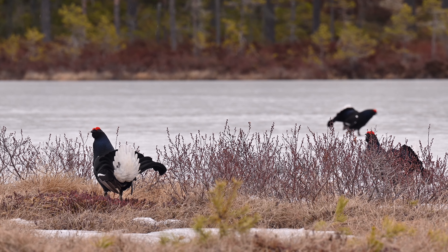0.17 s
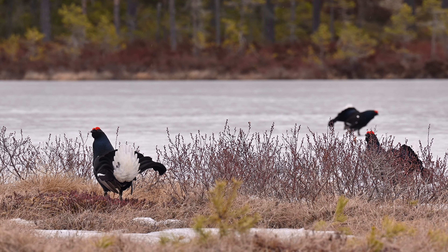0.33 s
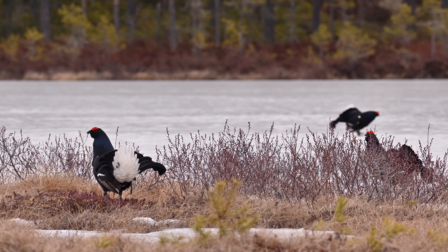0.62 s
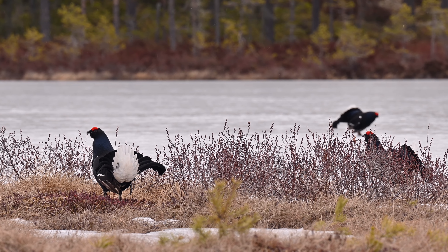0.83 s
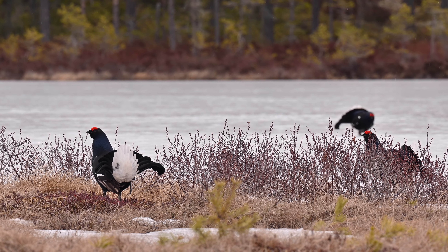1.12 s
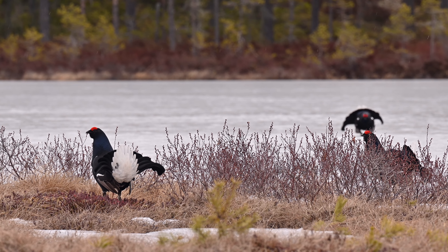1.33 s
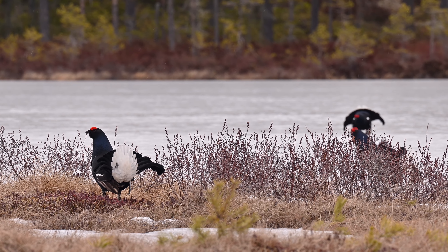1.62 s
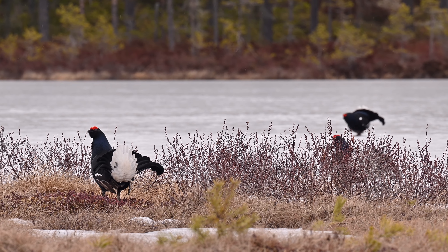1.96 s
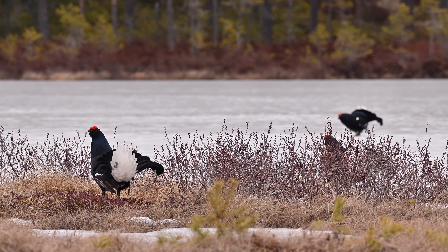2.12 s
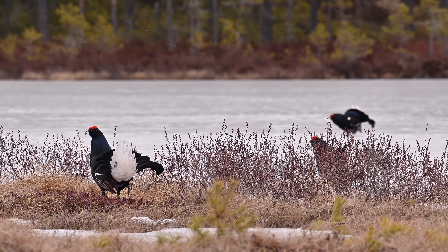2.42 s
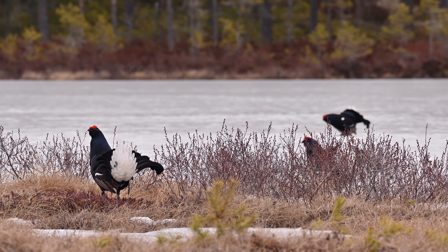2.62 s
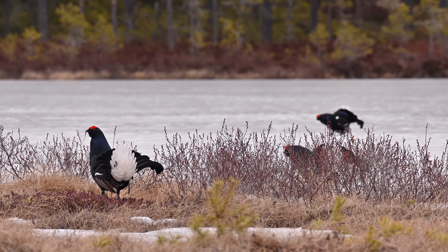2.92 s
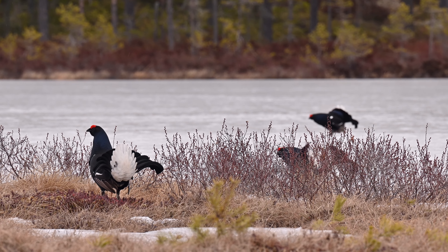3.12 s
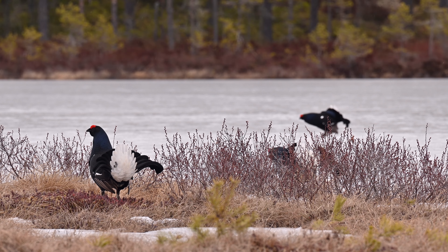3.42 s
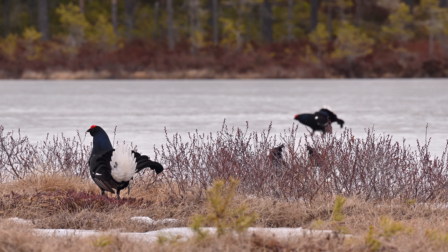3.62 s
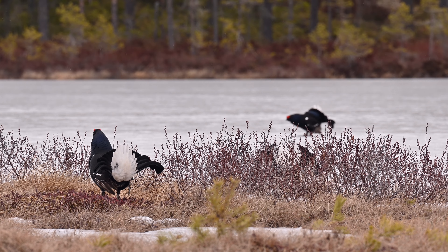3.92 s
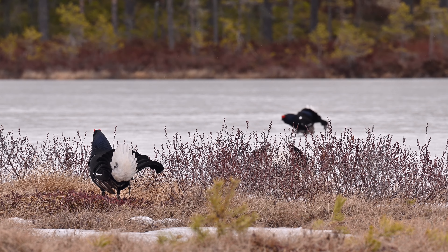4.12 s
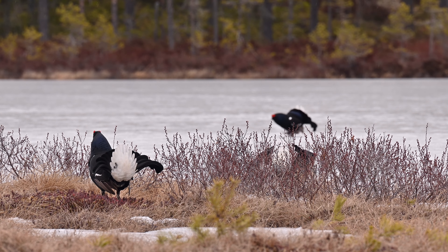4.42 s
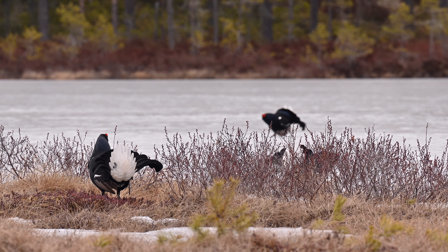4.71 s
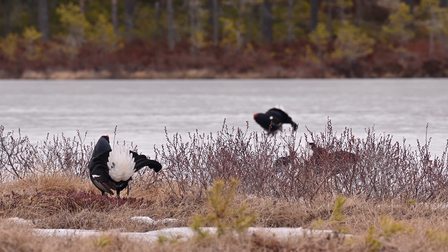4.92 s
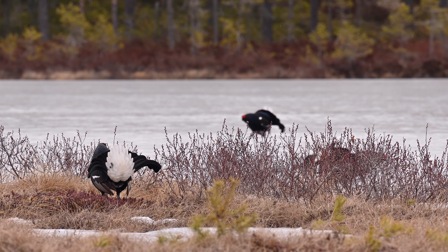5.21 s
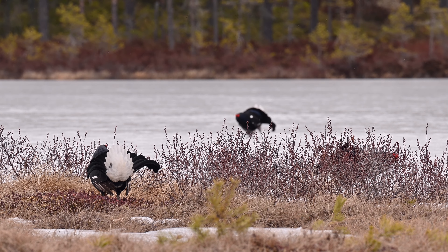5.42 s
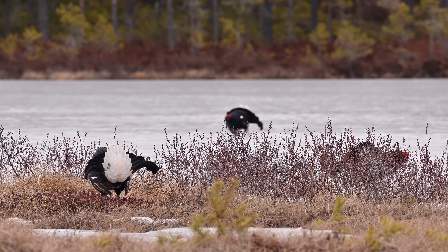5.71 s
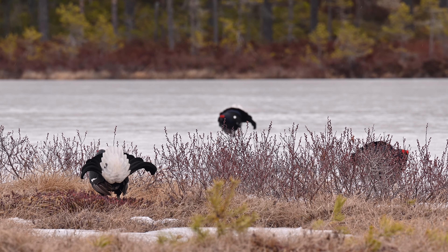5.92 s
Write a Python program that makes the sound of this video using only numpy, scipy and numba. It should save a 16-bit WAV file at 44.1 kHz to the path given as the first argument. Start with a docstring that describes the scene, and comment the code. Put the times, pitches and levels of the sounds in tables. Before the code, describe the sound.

Open bog by a frozen lake, quiet air noise, mono and outdoors. At 0 s a close grouse gives a sharp, breathy hiss lasting 0.3 s, while soft low coos begin bubbling, about fifteen a second, each a tiny hollow falling glide around 400 to 500 Hz. After a short gap they resume at 0.5 s and rise a little by 1.2 s; a faint foot tick falls at 1.3 s. From 1.8 to 2.4 s a farther, duller, uneven hiss passes beneath arched coos. Very faint hissing also carries across the bog. Distant thin whistles flicker from 2.3 s. Around 3.4 s come two soft footfalls. From 3.5 s the coos overlap, and after 4.2 s they are dense and louder, strongest near 5.6 s, with hurried high twitters around 5 to 5.5 s. Low wind swells gently at 5.5 s, a tick follows at 5.7 s, and bubbling continues to 6 s with a faint forest echo.

```python
"""Black grouse cocks display on a bog beside a frozen lake, bubbling in short, nearly pure gliding coos
whose loudness and band are set by the resonance of the inflated neck sac. Cocks hiss near and far: noise
bands with moving resonances. Distant thrushes whistle in flickering, smeared sines, and feet tick and thud
on frozen moss. The pine forest behind scatters the calls into a faint echo tail; steady air noise and
swelling low wind make a quiet floor."""
import sys
import numpy as np
from scipy import signal
from scipy.fft import rfft, irfft
from scipy.io import wavfile
from numba import njit

SR = 44100
rng = np.random.default_rng(int(sys.argv[2]) if len(sys.argv) > 2 else 0)


def to_wav(sig):
    """Store sig (one row per channel, or 1-D mono) as 16-bit WAV at the path in sys.argv[1].

    Samples outside -1..1 are clipped; the rate is SR.
    """
    pcm = np.clip(np.atleast_2d(sig), -1, 1) * 32767
    pcm = np.round(pcm).astype(np.int16)
    wavfile.write(sys.argv[1], SR, pcm.T)  # frames by channels


N = 267290   # length in samples

# Spectrum of the steady air noise. Each row: frequency in Hz, relative density in dB.
AIR_SPECTRUM = [(20, -26.5), (60, -5), (136, -6.5), (306, 6), (539, 6.5), (686, 3), (807, 6.5), (874, -3.5),
                (1310, -9), (2240, -9.5), (3450, -12), (5760, -13.5), (12200, -13.5), (15900, -14.5)]
AIR_DB = -66   # rms level
# Level path of the low wind. Each row: time in seconds, middle level of the gusts in dB.
WIND_LEVEL = [(0.0, -80), (1.3, -79), (2.3, -75), (3.0, -77.5), (3.4, -74.5), (4.8, -77), (5.5, -67.5),
              (6.06, -74)]

# Two hisses, near then far, as breakpoints. Each row: time in seconds, throat band level in dB,
# beak band in dB relative to the throat, top band in dB relative to the throat,
# upper resonance in Hz, throat resonance in Hz.
HISS_PATHS = [
    [(0.0, -47.5, -1, -24, 5860, 1780), (0.058, -49.5, -1, -11.5, 6300, 2130),
     (0.18, -50, -4.5, -9, 7350, 2250), (0.24, -51, -11, -10, 5980, 2080),
     (0.276, -54.5, -11, -17, 5670, 1940), (0.3, -91, 3, -12, 5640, 2010)],
    [(1.795, -75, -15, -10, 5700, 2070), (1.832, -55.5, -0.5, -28, 5700, 2090),
     (1.866, -50.5, 0, -18, 6360, 2120), (1.926, -61, -1.5, -14, 5500, 1970),
     (1.972, -59, -5.5, -17, 4990, 1620), (2.034, -61, -3, -21, 5300, 1710),
     (2.128, -59, 0, -17, 5540, 1660), (2.194, -59.5, -1, -30, 4270, 1980),
     (2.258, -59.5, -6, -31, 3950, 1750), (2.348, -64, -13.5, -13, 4400, 1900),
     (2.41, -84, -4, -12, 4600, 2000)],
]
# Throat noise of the near and the far cock. Each row: frequency in Hz, relative density in dB.
THROAT_NEAR_SPECTRUM = [(530, -40), (900, -11), (1250, -28), (1400, -18), (1580, -11.5), (2020, 0),
                        (2650, -4), (3240, -13), (3600, -26), (4680, -49), (7920, -120)]
THROAT_FAR_SPECTRUM = [(530, -37), (900, -2.5), (1090, -7.5), (1250, -8.5), (1530, 1), (1980, -3),
                       (2260, 2), (3280, -17.5), (3600, -12.5), (4680, -49), (7920, -120)]
# Upper noise of the near and the far cock. Each row: frequency in Hz, relative density in dB.
BEAK_NEAR_SPECTRUM = [(1760, -16.5), (3000, 0), (3260, -7), (3640, -0.5), (4510, -2), (4840, 0.5),
                      (5830, -1), (6430, -7), (6700, -7.5), (7750, -2), (8360, -6), (11800, -8),
                      (14100, -13), (15700, -20)]
BEAK_FAR_SPECTRUM = [(1760, -21), (3000, 4), (3370, -5), (3740, 4), (4500, -2.5), (4970, -0.5), (5520, -4),
                     (5980, -4), (6490, -6.5), (6800, -3.5), (7900, -10), (8470, -15), (9910, -21),
                     (12000, -22), (15600, -52), (22000, -120)]

# Falling notes of the bubbling roll. Each row: start in seconds, first pitch in Hz, effort in dB.
ROLL = [(0.016, 477, -38.5), (0.084, 456, -40.5), (0.151, 471, -38.2), (0.219, 487, -36.7),
        (0.544, 484, -38), (0.613, 483, -38), (0.68, 467, -35.5), (0.745, 495, -36.5), (0.816, 491.5, -35),
        (0.883, 493, -34.5), (0.95, 501, -34.7), (1.018, 511, -33), (2.768, 430, -32.5),
        (2.862, 455.4, -39.5), (2.935, 479, -38), (3.006, 485, -34.5), (3.073, 503, -35.5),
        (3.151, 480, -28.6), (3.219, 475.5, -27), (3.281, 508.6, -35.5), (3.289, 431.4, -34),
        (3.348, 524, -35), (3.354, 460.6, -33), (3.413, 524, -33.9), (3.484, 536, -32.5), (3.763, 463, -33),
        (3.831, 468, -31.5), (3.9, 466.4, -30.5), (3.924, 490.5, -32.5), (3.968, 471.6, -30.9),
        (3.987, 493, -37.5), (4.035, 490.5, -31.3), (4.171, 492.5, -30), (4.171, 516.6, -29),
        (4.482, 505, -32.5), (4.545, 504, -35.4), (4.709, 538, -34.5), (4.9, 528, -33), (5.167, 551, -29.5),
        (5.225, 505, -32), (5.232, 555, -31), (5.922, 507, -33)]
ROLL_NOTE_S, ROLL_SWELL_DB = 0.0438, -0.5   # note length; growth of effort through the note
ROLL_MIDDLE, ROLL_END = .87, 0.812   # pitch halfway and last, as share of the first
# Arched and freely gliding coos. Each row: start in seconds, length in seconds, first, middle and
# last pitch in Hz, effort in dB, growth of effort through the coo in dB.
ARCHED_COOS = [(0.285, 0.017, 469, 452, 422, -38.5, 1), (0.48, 0.043, 467, 411, 395, -36, 5),
               (1.086, 0.037, 548, 497, 436, -31, 0), (1.155, 0.034, 577, 565, 430, -27.5, -1.5),
               (1.218, 0.037, 590, 598, 496, -28, 4.5), (1.285, 0.025, 606, 604, 510, -29.5, -1),
               (1.494, 0.037, 347, 392, 402, -33, 6), (1.504, 0.03, 670, 566, 507, -43, -18),
               (1.557, 0.046, 445, 400, 387, -31, 5), (1.56, 0.055, 511, 592, 513, -28.5, 4.5),
               (1.699, 0.012, 592, 599, 544, -27, 3), (1.807, 0.049, 451, 597, 507, -29.5, 3.5),
               (1.88, 0.044, 425, 503, 475, -32, 15.5), (1.97, 0.038, 470, 597, 555, -30.5, -1),
               (2.01, 0.038, 545, 585, 575, -31.5, -6), (2.06, 0.017, 586, 596, 597, -35.5, 3),
               (2.083, 0.021, 620, 560, 502, -29, 5), (2.162, 0.01, 620, 570, 520, -43.5, -2),
               (2.203, 0.0088, 539, 492, 460, -35.5, 0), (2.228, 0.028, 481, 501, 425, -33, 1),
               (2.282, 0.017, 485, 540, 600, -31, 15.5), (2.312, 0.021, 633, 566, 495, -28.5, 0),
               (2.379, 0.01, 625, 576, 549, -27.5, -1), (2.46, 0.037, 571, 588, 550, -25.6, 4),
               (2.541, 0.03, 512, 569, 564, -26.5, 4.6), (2.585, 0.019, 539, 570, 615, -40, 4),
               (2.615, 0.02, 588, 567, 500, -27.5, 2.5), (2.715, 0.03, 340, 371, 404, -33, 3),
               (2.807, 0.043, 605, 447, 368, -33.5, 0.5), (2.875, 0.05, 390, 419, 360, -36.5, 10),
               (3.55, 0.039, 568, 489, 440, -31, 1), (3.621, 0.026, 570, 570, 480, -29, 1),
               (3.63, 0.024, 487, 420, 395, -33.5, 5), (3.66, 0.017, 418, 433, 457, -29.5, -2),
               (3.682, 0.036, 567, 605, 493, -28, 4), (3.69, 0.046, 480, 418, 367, -32.5, 2),
               (3.751, 0.027, 597, 600, 502, -31.5, -0.5), (3.975, 0.03, 543, 698, 564, -38, 2),
               (4.038, 0.058, 472.3, 623.6, 430, -31.5, 4), (4.044, 0.048, 529, 606, 450, -36, 5),
               (4.071, 0.068, 550, 499, 394, -29.5, 2), (4.176, 0.017, 534, 579, 494, -28.4, 2.5),
               (4.237, 0.034, 560, 540, 433, -25.5, 5), (4.279, 0.019, 449, 473, 541, -30, 3.5),
               (4.302, 0.041, 599, 580, 462, -23.5, 3.5), (4.347, 0.053, 357, 456, 404, -28.5, 8),
               (4.37, 0.035, 634.4, 602.3, 484, -23.8, 1.5), (4.391, 0.013, 457.5, 519, 487, -23, 0.5),
               (4.41, 0.046, 429, 446, 443, -32.5, -1), (4.43, 0.028, 594.5, 607, 477, -26.5, 1),
               (4.447, 0.057, 568.7, 582, 537, -29.5, -1), (4.502, 0.03, 442.5, 583, 575, -34.5, -4),
               (4.56, 0.023, 605, 565, 501, -30.5, 9.5), (4.612, 0.032, 513, 448, 420, -31.5, 1),
               (4.625, 0.0295, 587, 700, 607, -37, 7), (4.684, 0.063, 506, 572, 507, -28.5, 4),
               (4.684, 0.023, 453, 487, 510, -43, 1), (4.759, 0.019, 450, 530, 594, -34.5, 19.5),
               (4.786, 0.023, 679, 630, 513, -30.5, 5), (4.819, 0.024, 637, 548, 437, -25.5, -2.5),
               (4.85, 0.017, 606, 648, 581, -27.5, 7), (4.854, 0.023, 461, 453, 492, -28.5, 0.5),
               (4.922, 0.061, 402, 599, 413, -26, 5.5), (4.938, 0.062, 491, 596, 528, -37.5, -1),
               (5.015, 0.033, 489.7, 482, 448, -22.5, 6), (5.036, 0.024, 536.5, 563, 497, -27.5, -3),
               (5.073, 0.043, 536.5, 632, 482, -31.5, 1), (5.089, 0.071, 481.4, 524, 541, -30, 1),
               (5.098, 0.027, 497, 625, 480, -26, 5), (5.208, 0.037, 584.4, 507, 458, -31.5, 1.5),
               (5.308, 0.037, 529, 491, 437, -29, -2.5), (5.344, 0.066, 380, 496.5, 406, -28.5, 4.5),
               (5.357, 0.027, 390, 567, 472, -32.5, 4), (5.405, 0.017, 430, 488, 597, -25.5, 8.5),
               (5.44, 0.032, 563, 537, 466, -24, 0), (5.487, 0.064, 679, 566, 444, -26.5, 6),
               (5.49, 0.033, 657, 578.6, 542, -28, 1), (5.576, 0.058, 578, 615, 528, -21, -1),
               (5.593, 0.022, 472, 533, 470, -25, -0.5), (5.617, 0.065, 548.6, 616, 490, -20.7, 6),
               (5.62, 0.014, 543, 617, 589, -25, 3.5), (5.675, 0.031, 377.6, 567, 520, -26.5, 5),
               (5.71, 0.027, 635, 633, 592, -21.5, -5), (5.719, 0.024, 525, 597.5, 555, -20, -1),
               (5.758, 0.025, 502, 642, 595, -25.5, 2), (5.767, 0.031, 450.2, 671, 511, -22, 3),
               (5.775, 0.011, 515, 650, 521, -31, -5), (5.79, 0.015, 583.7, 532, 420, -24.5, -2),
               (5.8, 0.029, 561, 445, 410, -36.5, -3), (5.848, 0.034, 533, 435, 407, -29.5, -4.5),
               (5.958, 0.033, 652.5, 508, 338, -31, 9.5), (5.96, 0.035, 562, 512, 450, -35.5, 0),
               (6.0, 0.064, 513, 416, 364, -30, -0.5), (6.044, 0.016, 576, 638, 533, -30.5, 7)]
SAC_HZ, SAC_HALF_WIDTH_HZ = 524.1, 37.6   # a coo is favoured while its pitch crosses this resonance
SAC_LOW_HZ, SAC_HIGH_HZ = 252, 696   # band that the sac passes
ONSET_S, ONSET_DB = 0.007027, -13.5   # a coo starts this early and this softly, already on its glide
RELEASE_S, RELEASE_DB, RELEASE_DROP_HZ = 0.0033, -7, 30.3   # and dies away on a sinking pitch

ECHO_T60_S = 0.28
COO_ECHO_DB, WHISTLE_ECHO_DB, HISS_ECHO_DB = -26.5, -15, -22.5

# Cocks hissing across the bog. Each row: start in seconds, length in seconds, level in dB.
DISTANT_HISSES = [(0.286, 0.83, -79), (2.45, 1.12, -79)]
DISTANT_FADE_S = 0.22

# Feet on frozen moss. Each row: time in seconds, tick level in dB, thud level in dB.
FOOTSTEPS = [(1.296, -56.5, -74), (3.3687, -65, -56), (3.471, -66, -54), (5.7344, -61.5, -75)]

# Distant whistles. Each row: start in seconds, length in seconds, first, middle and last pitch in Hz,
# level at the middle in dB, before flicker and smear.
WHISTLE_NOTES = [ (2.25, 0.17, 2760, 2280, 2145, -72.5), (2.5, .07, 2480, 1970, 1920, -66.5),
                 (2.6, .09, 1990, 2100, 2260, -68.5), (2.881, 0.062, 2480, 2460, 2460, -69.5),
                 (2.97, .03, 2940, 2800, 2300, -64.5), (3.0, .025, 2440, 2550, 2800, -68),
                 (3.057, 0.12, 2905, 2780, 2480, -68), (3.195, 0.021, 2250, 1950, 1730, -71),
                 (3.577, 0.022, 3450, 4260, 4780, -69.5), (3.603, 0.03, 4800, 4880, 4780, -77),
                 (4.165, 0.14, 2900, 2960, 3140, -76.5), (4.26, 0.076, 4800, 4600, 4450, -79),
                 (4.382, .016, 4880, 4100, 3000, -73), (4.5, .016, 4940, 4350, 3610, -74),
                 (4.69, 0.053, 2880, 2490, 2420, -68.5), (4.749, 0.094, 2470, 2640, 2450, -63.5),
                 (4.863, .013, 4780, 4320, 3900, -74.5), (4.871, 0.016, 2545, 2680, 3030, -64),
                 (4.892, 0.029, 2750, 2520, 2570, -72.5), (4.99, 0.05, 2324, 2200, 2130, -69.5),
                 (5.04, 0.02, 2164, 2210, 2195, -70), (5.066, 0.015, 2195, 2160, 2200, -72.5),
                 (5.088, .025, 2220, 2254, 2250, -67), (5.078, 0.012, 3560, 3580, 3900, -61.5),
                 (5.098, .008, 3750, 3670, 3480, -65.5), (5.105, .017, 2350, 2580, 2950, -66),
                 (5.13, 0.012, 2830, 2720, 2670, -64.5), (5.159, .022, 2860, 2780, 2876, -68),
                 (5.165, .02, 3240, 3720, 4160, -68), (5.19, .018, 2810, 2880, 3040, -64),
                 (5.205, 0.024, 2730, 2450, 2550, -71.5), (5.268, .01, 3370, 3560, 3950, -61.5),
                 (5.289, 0.011, 2900, 2870, 2910, -66), (5.375, .022, 3500, 3960, 4050, -69),
                 (5.405, .018, 3390, 3920, 4470, -65.5), (5.424, 0.018, 4550, 4590, 4580, -72.5),
                 (5.41, .012, 2920, 3140, 3400, -69), (5.422, 0.024, 3440, 3430, 3580, -68),
                 (5.45, 0.022, 3590, 3270, 2800, -68.5)]
WHISTLE_EDGE_DB = 5.5   # a whistle is this much softer at both ends

CUTOFF_HZ = 15750


def amp(db):
    """Logarithmic scale: decibels become an amplitude gain."""
    return 10 ** (np.asarray(db) / 20)


def rms_one(x):
    """Normalisation: a signal is scaled to unit rms."""
    return x / np.sqrt(np.mean(x ** 2) + 1e-20)


def coloured(spectrum, size):
    """Spectral shaping: white noise is weighted in frequency and brought to unit rms."""
    hz, db = np.transpose(spectrum)
    grid = np.fft.rfftfreq(size, 1 / SR) + 1
    weights = amp(np.interp(np.log(grid), np.log(hz), db))
    return rms_one(irfft(rfft(rng.standard_normal(size)) * weights, size))


def drift(per_s, size):
    """Low-pass filtering: two equal poles turn white noise into a slow wander of unit rms."""
    r = np.exp(-2 * np.pi * per_s / SR)
    wander = signal.lfilter([1], [1, -2 * r, r * r], rng.standard_normal(size + SR))
    return rms_one(wander[SR:])   # the first second lets the filter settle


def add(out, start_s, piece):
    """Superposition: a piece is summed into a track, cut at the track's ends."""
    i = round(start_s * SR)
    piece = piece[max(-i, 0):N - i]
    out[max(i, 0):max(i, 0) + len(piece)] += piece


def arc(first, middle, last):
    """Quadratic interpolation: a parabola through three values, with its steps from 0 to 1."""
    u = np.linspace(0, 1, num=17)
    start_part = first * (1 - u) * (1 - 2 * u)
    middle_part = middle * (1 - (2 * u - 1) ** 2)
    return u, start_part + middle_part + last * u * (2 * u - 1)


def glide(s, hz, db, rise_s, fall_s):
    """Frequency modulation: phase is the integral of pitch; short fades lie before and after the path."""
    t = np.arange(s[0] - rise_s, s[-1] + fall_s, 1 / SR)
    ramp = np.minimum((t - s[0]) / rise_s, (s[-1] - t) / fall_s) + 1
    fades = np.sin(np.pi / 2 * np.clip(ramp, 0, 1)) ** 2
    phase = 2 * np.pi * (rng.random() + np.cumsum(np.interp(t, s, hz)) / SR)
    return amp(np.interp(t, s, db)) * fades * np.sin(phase)


@njit
def moving_resonance(x, hz, r, sr):
    """Resonance: a pole pair of radius r whose centre frequency follows hz."""
    y = np.zeros(len(x))
    for i in range(2, len(x)):
        drive = (1 - r * r) / 2 * (x[i] - x[i - 2])
        y[i] = drive + 2 * r * np.cos(2 * np.pi * hz[i] / sr) * y[i - 1] - r * r * y[i - 2]
    return y


def swept(spectrum, centre_hz, width_hz, boost_db):
    """Resonance in turbulence: coloured noise plus its own response to one moving resonance."""
    air = coloured(spectrum, len(centre_hz))
    pole_radius = np.exp(-np.pi * width_hz / SR)
    return rms_one(air + amp(boost_db) * moving_resonance(air, centre_hz, pole_radius, SR))


def floor():
    """Broadband background: steady coloured air noise, with band-limited low wind that swells."""
    s, db = np.transpose(WIND_LEVEL)
    low_band = signal.butter(2, [100, 250], "band", fs=SR, output="sos")
    wind = signal.sosfilt(low_band, rng.standard_normal(N))
    gusts = amp(np.interp(np.arange(N) / SR, s, db) + 3.0 * drift(8.3, N))
    return amp(AIR_DB) * coloured(AIR_SPECTRUM, N) + gusts * rms_one(wind)


def hiss(rows, throat_spectrum, beak_spectrum, boost_db, flutter_db, split_hz=8400):
    """Turbulent air: throat and beak noise, each with a moving resonance, and thin air above the split."""
    s, *columns = np.transpose(rows)
    t = np.arange(s[0], s[-1], 1 / SR)
    db, beak_db, top_db, upper_hz, throat_hz = [np.interp(t, s, c) for c in columns]
    throat = swept(throat_spectrum, throat_hz, width_hz=710, boost_db=19)
    upper = swept(beak_spectrum, upper_hz, width_hz=700, boost_db=boost_db)
    beak, top = [rms_one(signal.sosfilt(signal.butter(4, split_hz, side, fs=SR, output="sos"), upper))
                 for side in ("low", "high")]
    layers = [throat, amp(beak_db) * beak, amp(top_db) * top]
    # each layer flutters on its own
    fluttering = sum(layer * amp(flutter_db * drift(31.0, len(t))) for layer in layers)
    out = np.zeros(N)
    add(out, s[0], amp(db) * fluttering)
    return out


def hisses():
    """Spectral loss with distance: one near cock, and one farther, softer and duller."""
    near = hiss(HISS_PATHS[0], THROAT_NEAR_SPECTRUM, BEAK_NEAR_SPECTRUM, boost_db=5.5, flutter_db=0.5)
    far = hiss(HISS_PATHS[1], THROAT_FAR_SPECTRUM, BEAK_FAR_SPECTRUM, boost_db=2, flutter_db=0.55)
    return near + far


def coos(rise_s=0.003, fall_s=0.0038):
    """Resonant filtering: the neck sac favours one pitch of a gliding tone, passes one band and rounds edges."""
    out = np.zeros(N)
    lead_s = .001   # tones are placed early, because the sac's band filter answers a little late
    rolls = [(s, ROLL_NOTE_S, hz, hz * ROLL_MIDDLE, hz * ROLL_END, db, ROLL_SWELL_DB)
             for s, hz, db in ROLL]
    for start, length, first, middle, last, effort_db, swell_db in rolls + list(ARCHED_COOS):
        u, hz = arc(first, middle, last)
        s = start + length * u
        db = effort_db + swell_db * (u - .5)
        slope = (hz[1] - hz[0]) / (s[1] - s[0])
        # extend the path by the soft onset and the sinking release
        s = np.r_[start - ONSET_S, s, s[-1] + RELEASE_S]
        hz = np.r_[first - slope * ONSET_S, hz, last - RELEASE_DROP_HZ]
        db = np.r_[db[0] + ONSET_DB, db, db[-1] + RELEASE_DB]
        sac_db = -10 * np.log10(1 + ((hz - SAC_HZ) / SAC_HALF_WIDTH_HZ) ** 2)
        add(out, s[0] - rise_s - lead_s, glide(s, hz, db + sac_db, rise_s, fall_s))
    sac_band = signal.butter(3, [SAC_LOW_HZ, SAC_HIGH_HZ], "band", fs=SR, output="sos")
    return signal.sosfilt(sac_band, out + 1e-18)   # the tiny offset avoids denormal numbers


def forest(x, gap_s, t60_s, dull_hz):
    """Multiple scattering: many trunks return a dull, dying noise tail that swells in over a gap."""
    t = np.arange(2 * SR) / SR
    tail = rng.standard_normal(len(t)) * amp(-60 * t / t60_s) * np.clip(t / gap_s, 0, 1) ** 2
    tail = signal.sosfilt(signal.butter(2, dull_hz, fs=SR, output="sos"), tail)
    return signal.fftconvolve(x, tail / np.sqrt(np.sum(tail ** 2)))[:N]


def distant_hiss(patchy_db=3.0):
    """Loss of treble with distance: only the throat band carries, patchy and fading in and out."""
    t = np.arange(N) / SR
    swell = np.zeros(N)
    for s, length, db in DISTANT_HISSES:
        inside_s = np.minimum(t - s, s + length - t)
        swell += amp(db) * np.clip(inside_s / DISTANT_FADE_S + .5, 0, 1)
    return swell * amp(patchy_db * drift(13.0, N)) * coloured(THROAT_FAR_SPECTRUM, N)


def steps(tick_s=0.0014, thud_s=0.01, thud_hz=110):
    """Impact: each step is a crisp decaying noise tick and a low damped sine thud."""
    out, t = np.zeros(N), np.arange(SR // 10) / SR
    for s, tick_db, thud_db in FOOTSTEPS:
        tick = amp(tick_db) * rng.standard_normal(len(t)) * np.exp(-t / tick_s)
        thud = amp(thud_db) * np.exp(-t / thud_s) * np.sin(2 * np.pi * thud_hz * t)
        add(out, s, tick + thud)
    return out


def whistles(fade_s=.004, scatter_db=2.5, paths_s=.006):
    """Multipath propagation: gliding sines flicker and smear over short paths through the trees."""
    out = np.zeros(N)
    for start, length, first, middle, last, db in WHISTLE_NOTES:
        u, hz = arc(first, middle, last)
        level_db = db - WHISTLE_EDGE_DB * (2 * u - 1) ** 2
        add(out, start - fade_s, glide(start + length * u, hz, level_db, fade_s, fade_s))
    t = np.arange(SR // 20) / SR
    paths = .03 * rng.standard_normal(len(t)) * np.exp(-t / paths_s)
    paths[0] = 1   # the direct path
    flickering = out * amp(scatter_db * drift(80., N))
    return signal.fftconvolve(flickering, paths)[:N]


def scene():
    """Superposition of all birds, the steps, the forest echo of the calls and the floor."""
    background = floor()
    breath = hisses() + distant_hiss()
    coo, song = coos(), whistles()
    calls = amp(COO_ECHO_DB) * coo + amp(WHISTLE_ECHO_DB) * song + amp(HISS_ECHO_DB) * breath
    trees = forest(calls, gap_s=0.02, t60_s=ECHO_T60_S, dull_hz=3100)
    return (coo + breath + song + steps() + trees + background)[None]


def record(dry):
    """Band limiting: the deep bass is rolled off gently and the top is cut steeply."""
    bass_cut = signal.butter(2, 25., "high", fs=SR, output="sos")
    top_cut = signal.ellip(12, .3, 60, CUTOFF_HZ, fs=SR, output="sos")
    return signal.sosfilt(top_cut, signal.sosfilt(bass_cut, dry))


dry = scene()
out = record(dry)
to_wav(out)
```